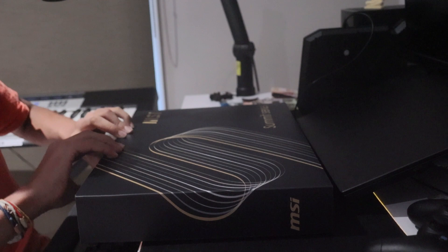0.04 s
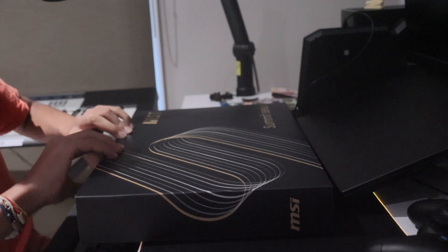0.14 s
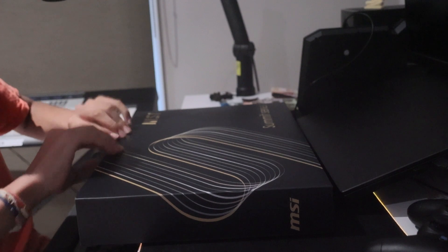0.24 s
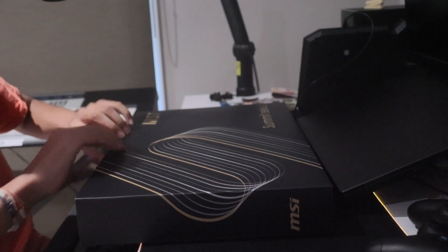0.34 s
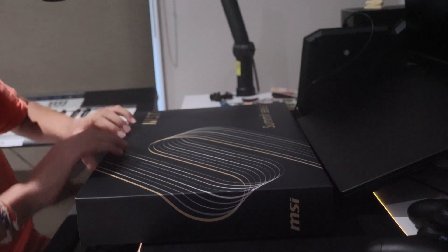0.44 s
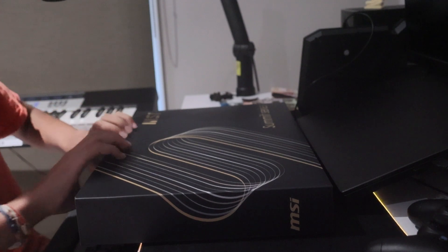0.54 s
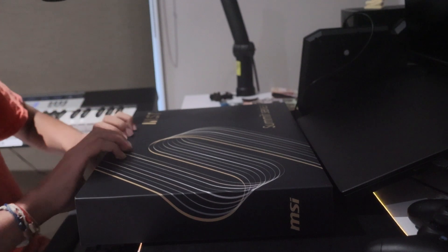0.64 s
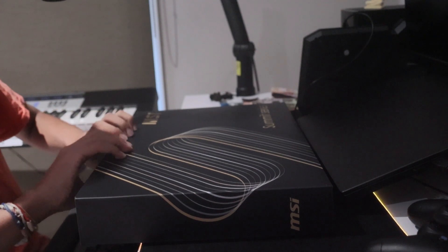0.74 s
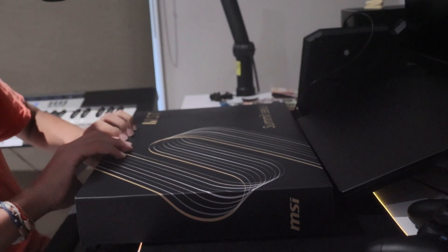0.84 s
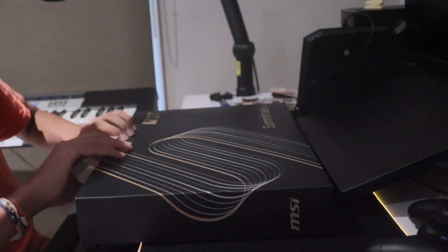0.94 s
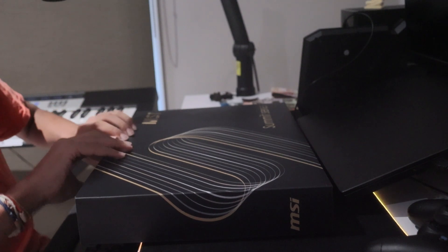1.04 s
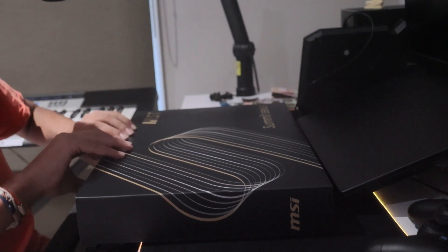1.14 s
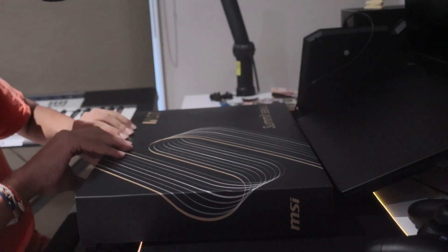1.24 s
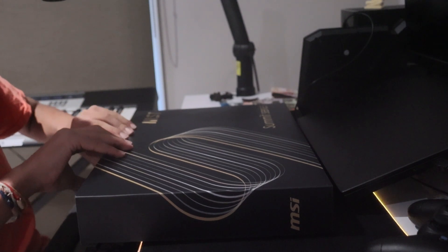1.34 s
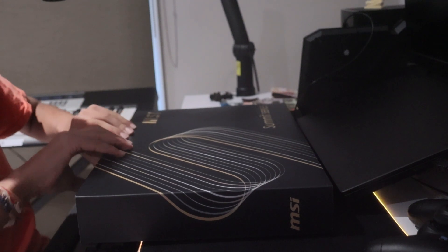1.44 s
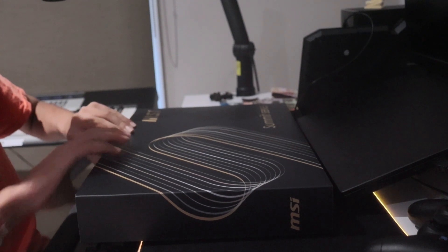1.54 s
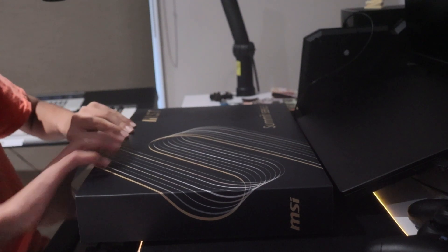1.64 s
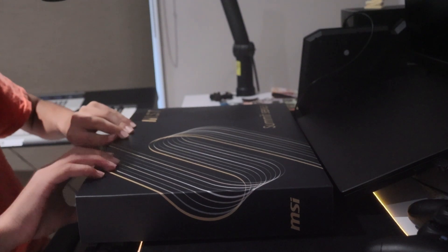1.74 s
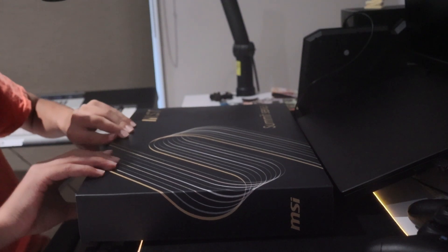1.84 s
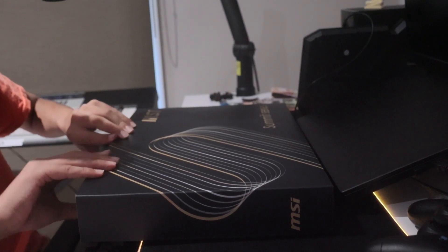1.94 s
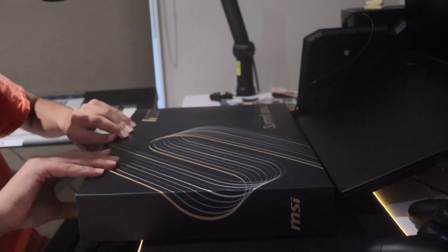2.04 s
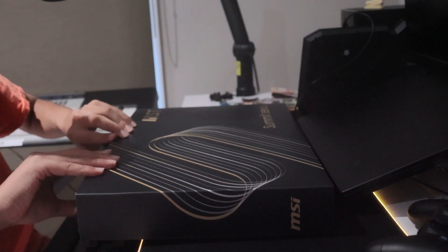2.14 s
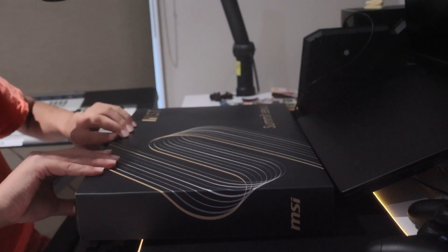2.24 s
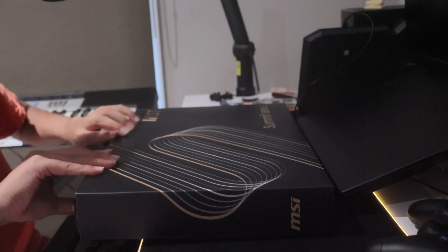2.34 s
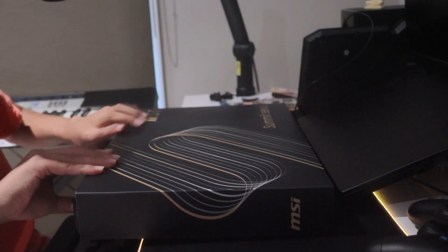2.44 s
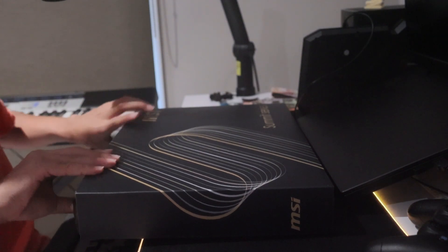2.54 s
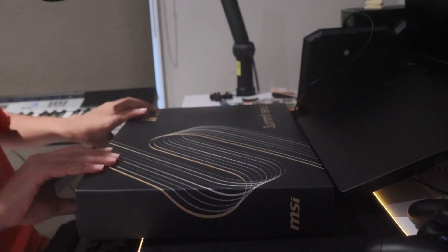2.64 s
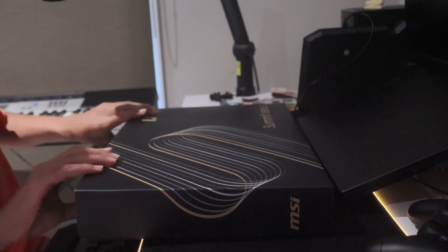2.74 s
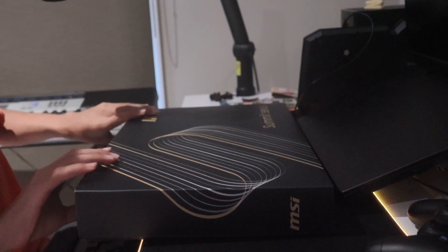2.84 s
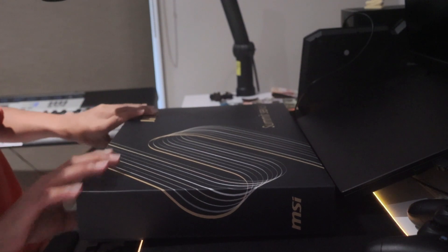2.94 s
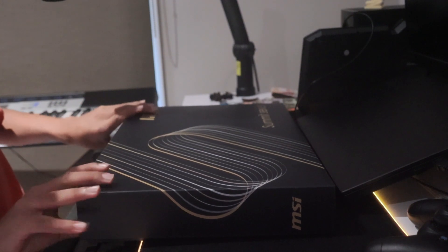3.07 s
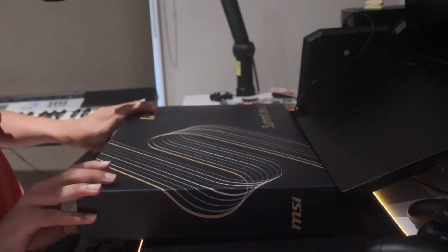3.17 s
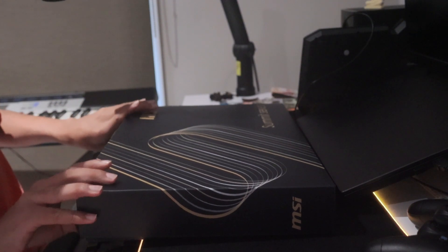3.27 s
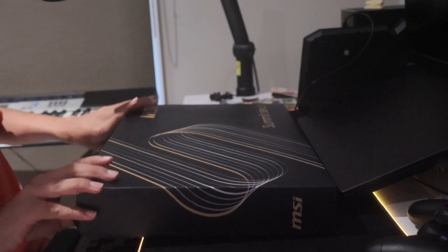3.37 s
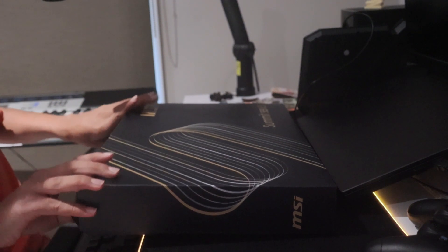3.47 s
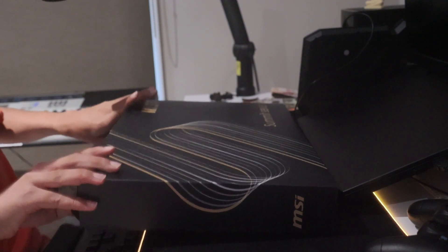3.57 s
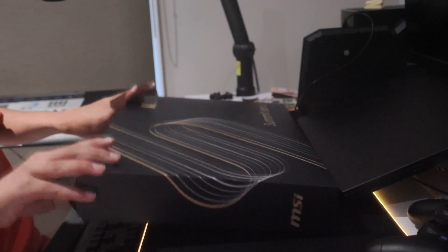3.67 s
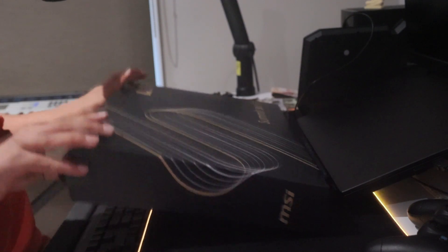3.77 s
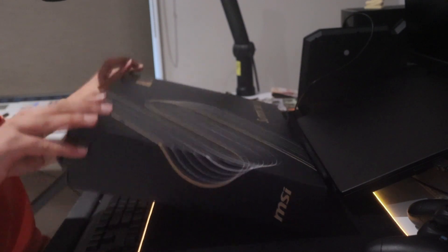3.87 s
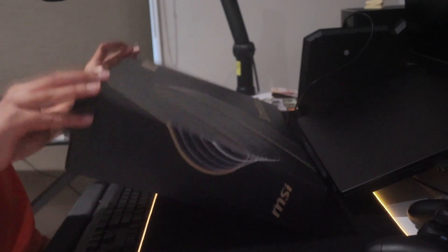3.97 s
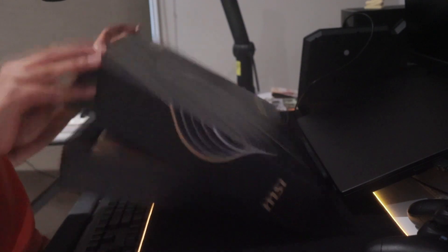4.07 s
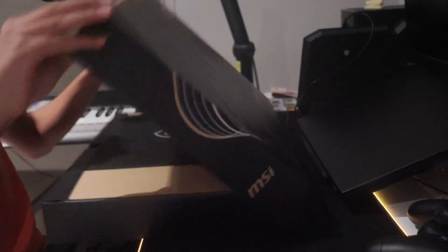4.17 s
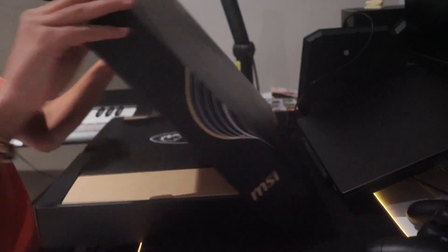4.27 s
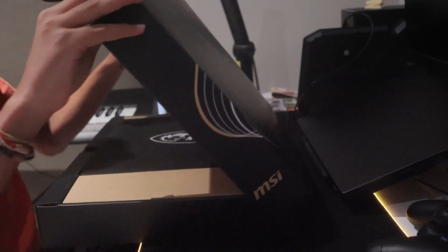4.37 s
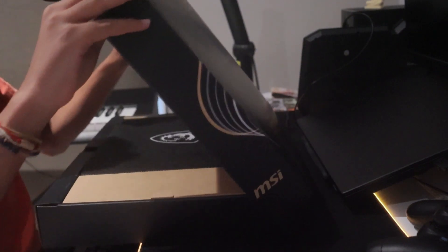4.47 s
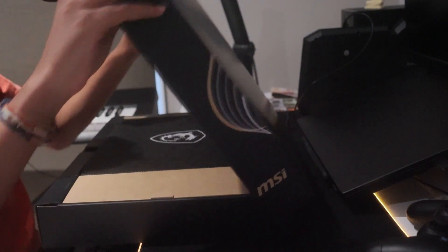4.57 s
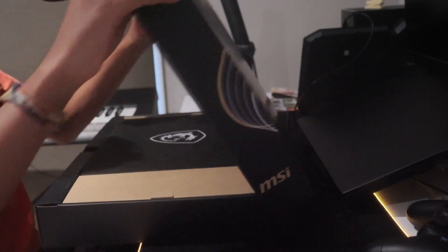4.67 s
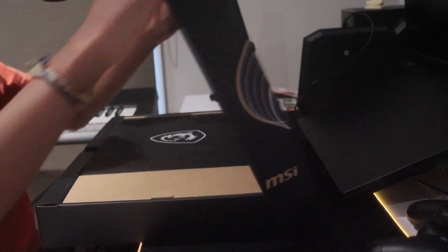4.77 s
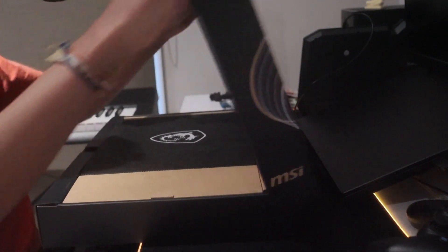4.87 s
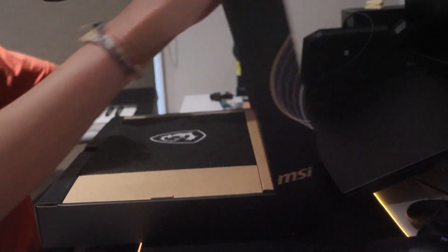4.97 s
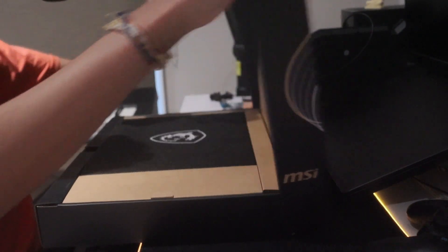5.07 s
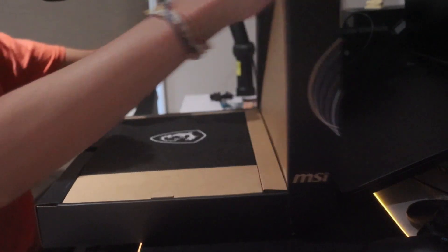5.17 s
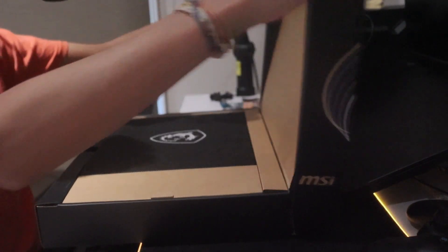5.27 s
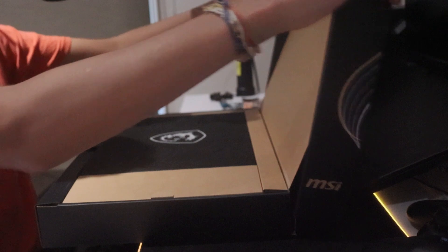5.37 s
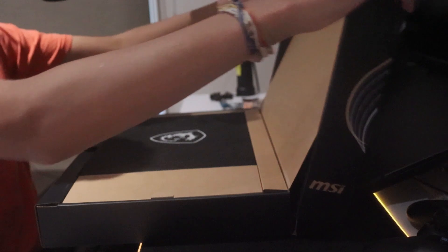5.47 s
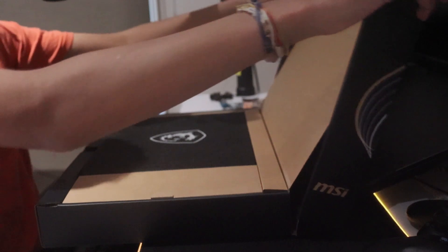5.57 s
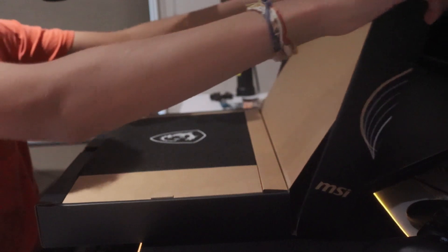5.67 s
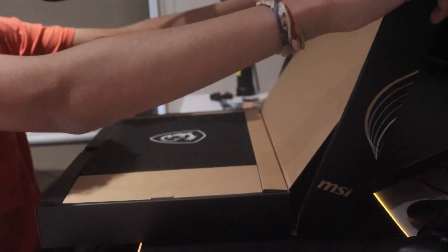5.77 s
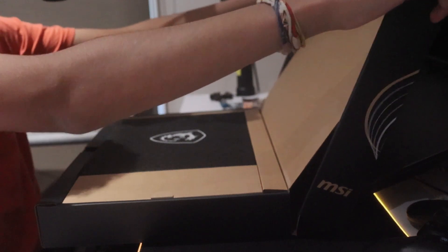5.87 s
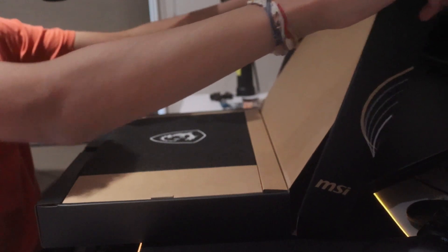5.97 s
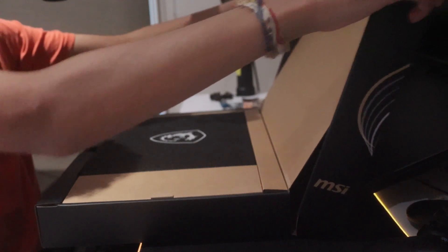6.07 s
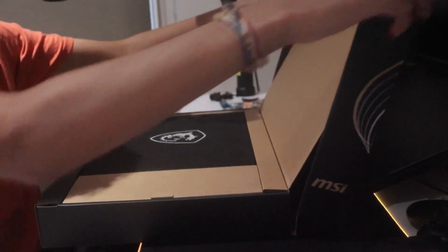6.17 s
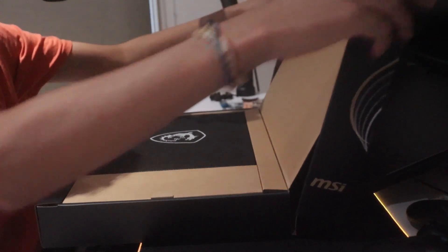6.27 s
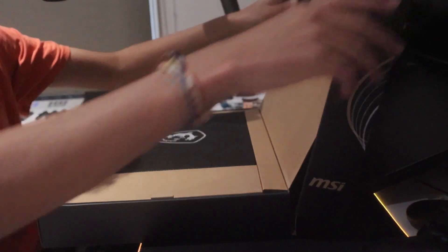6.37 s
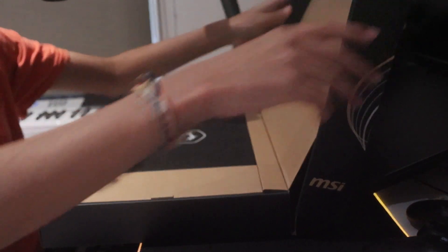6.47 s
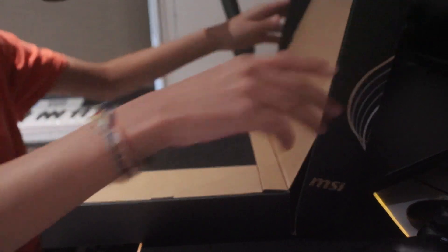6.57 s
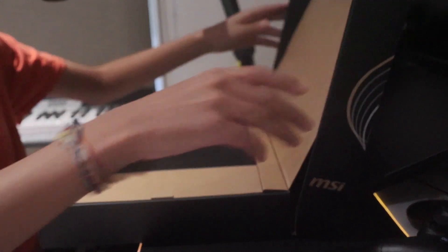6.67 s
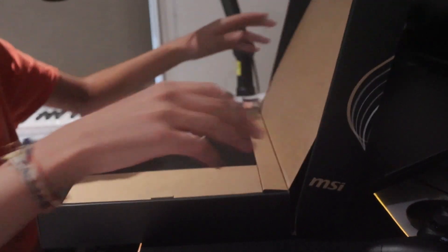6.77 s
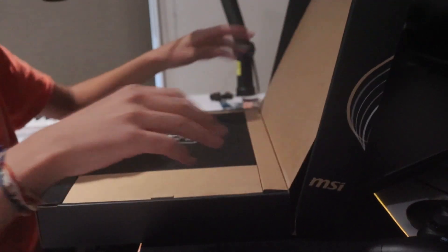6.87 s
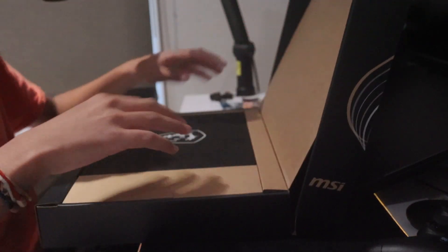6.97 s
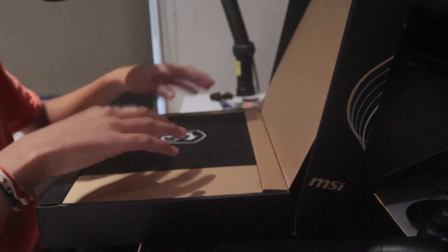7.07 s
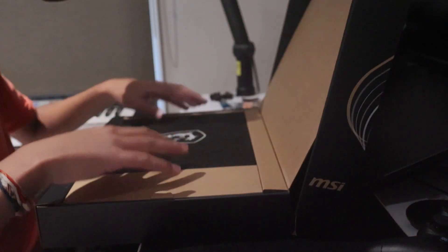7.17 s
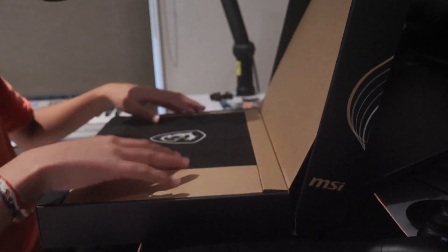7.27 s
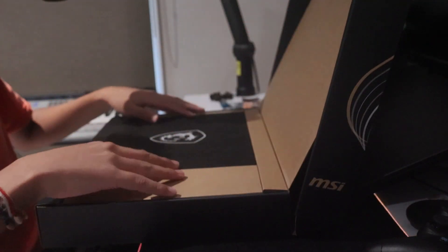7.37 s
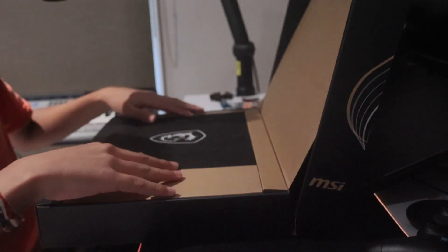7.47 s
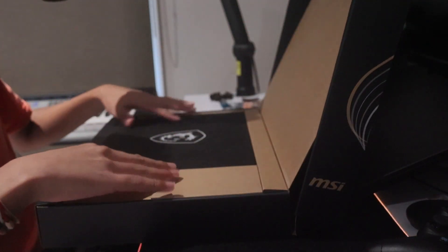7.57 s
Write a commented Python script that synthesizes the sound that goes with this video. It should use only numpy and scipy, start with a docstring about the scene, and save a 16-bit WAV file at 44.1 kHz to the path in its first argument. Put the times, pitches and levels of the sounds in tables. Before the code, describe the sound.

Hands tap and rub a cardboard box, two hard hollow knocks land seconds apart, then the lid scrapes and groans open over faint fan hum.

```python
"""Hands work the flaps of a cardboard box on a desk in a small room: fingers tap and rub the board,
tabs snap free, the tray drops on the desk twice, and the lid scrapes and groans as it swings open.
Blows ring decaying modes and noise bursts, rubbing is grainy noise, panel rings and groans are narrow
noise whose pitch may glide. A small metal part jumps on the desk, ringing its own modes. Fans hum behind
as steady noise, a blade tone and a low rumble that comes and goes. A close stereo pair listens."""
import sys
import numpy as np
from scipy import signal
from scipy.fft import rfft, irfft, next_fast_len
from scipy.io import wavfile
from scipy.ndimage import map_coordinates

SR = 44100
rng = np.random.default_rng(int(sys.argv[2]) if len(sys.argv) > 2 else 0)


def dump(signal):
    """Clip the signal to [-1, 1] and save it as 16-bit WAV at the path in sys.argv[1]."""
    limited = np.clip(np.atleast_2d(signal).T, -1, 1)
    pcm = np.round(limited * 32767).astype(np.int16)
    wavfile.write(sys.argv[1], SR, pcm)


N = 335601

# Fan air in the room: (frequency [Hz], relative level [dB per Hz])
FAN_AIR_SPECTRUM = [(20, -36.5), (45, -21), (70, -17), (90, -5), (116, -22), (141, -9), (180, -21.5),
                    (400, -20.5), (700, -23.5), (1500, -25.5), (3500, -27), (8000, -32), (15900, -41)]
# Left-right likeness of the fan noise and rumble at the pair: (frequency [Hz], likeness [-1 to 1])
FAN_LIKENESS = [(60, 0.76), (180, 0.76), (550, -0.049), (1650, -0.26), (4970, -0.48), (15000, -0.48)]
# Fan blade tone: (frequency [Hz], level [dB])
BLADE_TONE = [(640.6, -79)]
# Low noise that comes and goes: (time [s], level [dB])
RUMBLE_LEVEL = [(0.0, -71), (0.27, -64), (0.68, -74), (0.849, -61.5), (1.65, -62), (2.05, -66),
                (2.41, -59.5), (2.8, -73), (3.11, -60), (3.48, -70), (4.3, -60.5), (5.38, -75), (5.7, -65),
                (6.8, -85.5), (7.61, -76.5)]
# Colour of that low noise: (frequency [Hz], relative level [dB per Hz])
RUMBLE_SPECTRUM = [(12, -61.5), (20, -29), (75, 1), (108, -8), (140, -1.5), (170, -19.5), (220, -50.5),
                   (370, -120)]
# Decay of the small room: (frequency [Hz], t60 [s])
ROOM_DECAY = [(100, 0.25), (400, 0.26), (1500, 0.29), (5000, 0.3), (14000, 0.18)]
# Left-right likeness of room tail, rubbing and cracks: (frequency [Hz], likeness [-1 to 1])
BOX_LIKENESS = [(60, 1), (150, 1), (380, 0.99), (950, 0.97), (2380, 0.9), (5980, 0.7), (15000, -0.068)]
# Modes of the box's air and walls: (frequency [Hz], relative level [dB], t60 [s])
BOX_MODES = [(137.3, -4.5, 0.28), (199.9, -14.5, 0.14), (267, -2.5, 0.14), (320.9, -1, 0.04),
             (407, 3, 0.48), (484, -0.5, 0.026), (585, -0.5, 0.11), (680, -9, 0.017), (748.6, -7, 0.097),
             (787, -9, 0.2), (1105, -15, 0.12)]
# Upper modes of the board: (frequency [Hz], width [Hz], relative level [dB])
BOARD_MODES = [(1020, 1500, -5.5), (2500, 1500, -4), (3950, 3400, -10.5)]
# Panels driven by rubbing: (frequency [Hz], relative level [dB per Hz])
PANEL_SPECTRUM = [(41, -61), (70, -37), (134, -13), (187, -15), (237, -3), (269, -6), (900, -8),
                  (1170, -42.5), (1980, -120)]
# Body of the rubbing: (frequency [Hz], relative level [dB per Hz])
RUB_SPECTRUM = [(400, -34.5), (700, -6), (1000, -3.5), (1800, -7.5), (2500, -14), (4000, -29), (8000, -73)]
# Rasp of the fibres: (frequency [Hz], relative level [dB per Hz])
RASP_SPECTRUM = [(1200, -27), (2200, -0.5), (3000, 1), (4200, -2.5), (5500, -5), (7500, -16),
                 (11000, -39.5)]
# Fine hiss of a smooth fast glide: (frequency [Hz], relative level [dB per Hz])
HISS_SPECTRUM = [(3820, -21), (6500, -5), (11900, -11.5), (15100, -11.5), (15900, -20.5)]
# Crack of a blow: (frequency [Hz], relative level [dB per Hz])
CRACK_SPECTRUM = [(1500, -31.5), (3000, -6), (4500, 3), (8000, -0.5), (15900, -8)]
# A small metal part on the desk: (frequency [Hz], relative level [dB], t60 [s])
METAL_MODES = [(4980, 1, 0.16), (5800, 5.5, 0.09), (5900, 2.5, 0.08), (7550, -9.5, 0.028),
               (9160, 3.5, 0.025), (12400, -6, 0.025)]
# Jumps of the metal part as the desk shakes: (time [s], level [dB])
METAL_JUMPS = [(2.298, -55), (4.268, -36), (4.29, -34.5), (4.333, -37.5)]
# Panels that ring after a blow or groan when dragged: (time of full strength [s], rise [s], hold [s],
# fall t60 [s], level [dB], pitch [Hz], glide [Hz per s])
PANEL_TONES = [(0.01, .01, .06, .15, -37, 1057, 0.5), (0.14, 0.009, 0.042, .3, -37, 1249, -200),
               (0.265, .015, 0.036, .2, -24, 603, -1), (0.827, 0.13, 0.1, .28, -50.5, 432, 100),
               (1.129, .06, .07, .4, -53.5, 1148, -50), (1.8, 0.059, .02, 0.31, -50, 135.2, 10.5),
               (3.35, .15, 0.025, .6, -48.5, 265.5, -40), (4.24, .03, .02, 0.2006, -22, 205.2, -0.5),
               (4.38, .15, 0.0059, 0.47, -27, 302.8, 29), (4.863, .5, .1, 0.29, -44.5, 332.3, 39.5),
               (5.139, .2, .05, .2, -55, 345.9, 79.5), (5.339, .2, .06, 0.24, -39.5, 240.1, 11.5),
               (5.521, .1, 0.055, 0.14, -34.5, 237.5, 94), (6.2, .25, .005, .4, -50, 341.7, -19)]
# Board rubbing or rattling on board, one row a stroke: (time of full strength [s], rise [s], hold [s],
# fall t60 of the rub [s], rub level [dB], weight over rub [dB], bite over rub [dB], swish over rasp [dB])
# weight = boom of the panels, bite = rasp of the fibres, swish = fine hiss
RUB_STROKES = [(0.0, .003, 0.009, 0.49, -35.5, -1, -0.5, -3.5),
               (0.14, 0.016, 0.038, .2, -36.5, 0.5, -1.5, -3.5),
               (0.262, 0.011, 0.023, .5, -30.5, 5.5, -6.5, -4), (0.7, 0.022, .01, .15, -72.5, 12, 6, -19),
               (0.775, 0.03, .17, 0.31, -54.5, 6, -7, -10.5),
               (1.016, 0.047, 0.013, .3, -58, -1, -6.5, -13.5), (1.15, 0.16, 0.014, .5, -53, -5, -14, -8),
               (1.27, .02, .01, .5, -67.5, -2, -2.5, -5.5),
               (1.46, .015, 0.024, 0.299, -72.5, 6.5, -0.5, 10),
               (1.55, 0.008, 0.056, .25, -52, 4, -1.5, -13.5),
               (1.782, 0.078, .04, .25, -54, -0.5, -2, -13.5),
               (1.886, 0.015, .005, .3, -57.5, -6, -11, -10.5),
               (2.06, 0.049, 0.0041, .25, -67.5, 16.5, 2, -12), (2.18, .02, .01, .5, -72.5, 17, -1, -10),
               (2.31, .01, .06, .35, -45.5, 1, -3, -20), (2.66, 0.018, 0.028, .2, -52.5, -4, -3, -7),
               (2.696, 0.041, 0.0058, .25, -47, -4, -1.5, -7),
               (2.794, 0.017, 0.0067, .5, -53, 2, -13.5, -8),
               (2.93, .08, 0.024, 0.34, -58.5, 5.5, -3.5, -7.5), (2.97, .006, 0.069, .4, -52, 0, -2, -6.5),
               (3.072, 0.093, 0.021, .6, -43.5, -1.5, -5, -8.5), (3.306, .03, .02, 0.44, -55, 8, -12, -4),
               (3.48, 0.041, .07, .3, -74.5, 15, 3, -10.5), (3.69, 0.011, .02, 0.287, -61, 3, 2.5, -6),
               (3.766, .07, .18, 0.79, -51, 3, 4, -1.5), (4.066, 0.1, .02, 0.55, -44, 3, -1, -0.5),
               (4.13, .01, 0.011, 0.42, -37.5, 7.5, -2, -14.5), (4.185, .006, .02, .2, -36, 3, 2, -6.5),
               (4.225, 0.012, 0.083, 0.62, -27.5, 3, -5.5, -3), (4.78, 0.29, 0.035, .4, -48, 1.5, -8, -16),
               (4.853, 0.01994, 0.00509, 0.66, -46, 6.5, -13.5, -9.5),
               (4.985, .06, .005, 0.51, -50.5, 6, -18.5, -13),
               (5.191, 0.031, 0.016, 0.56, -51.5, 2.5, -6, -12.5),
               (5.29, .15, 0.14, 0.334, -50.5, 10.5, -8.5, -9.5),
               (5.44, .02, 0.15, 0.93, -46.5, 5.5, -8.5, -14),
               (5.719, 0.047, 0.012, .6, -42, 8.5, -1, -14.5),
               (5.86, .04, .02, .2, -52.5, 5.5, -6.5, -10.5),
               (6.002, 0.042, .04, 0.445, -65.5, -0.5, -5, -10),
               (6.2, .25, 0.034, .4, -53.5, -1.5, -0.5, -15), (6.31, 0.029, .05, 0.51, -62.5, 5, -4.5, -9),
               (6.52, 0.013, .04, .3, -63, -3.5, -2.5, -13), (7.19, 0.032, 0.0051, .6, -73.5, -10, 3, -12),
               (7.41, 0.011, .05, 0.99, -73.5, 6.5, -1.5, -7), (7.6, .1, .02, .3, -62.5, 2, -0.5, 1)]
# Blows on the box: (time [s], knock peak [dB], thud over knock [dB], crack over knock [dB],
# thud centre [Hz], knock centre [Hz], crack centre [Hz], rattle t60 [s])
BOX_BLOWS = [(0.128, -17, -18.5, -1.5, 400, 1200, 5260, 0.057),
             (0.132, -14.5, -15.5, -5, 404, 1187, 6170, 0.027),
             (0.244, -10, -4, -23.5, 303, 900, 4200, 0.045), (0.247, -5, 1.5, -10.5, 283, 1676, 4230, .015),
             (0.275, -24.5, 10.5, -26, 265.2, 900, 4200, 0.09),
             (0.746, -44, -3, -25, 398, 1600, 4090, 0.025), (1.257, -50, -8, -1, 200, 1800, 5330, 0.021),
             (1.452, -68, -7.5, 23, 198, 900, 9250, 0.048), (1.536, -40, 10, -15, 134.4, 810, 4300, 0.03),
             (1.775, -43.5, -4, -10.5, 132, 1350, 5114, .03),
             (1.807, -43, -19, -4.5, 135, 1260, 4990, 0.037), (1.879, -41, -2, -28, 415, 1090, 4350, 0.021),
             (1.999, -49, 15.5, -10, 397, 2700, 4440, 0.036), (2.042, -51.5, 14, -5, 456, 800, 4390, 0.029),
             (2.262, -47, 1.5, -4, 418, 1480, 6790, .02), (2.297, -28, -1.5, -9.5, 566, 2330, 5730, 0.044),
             (2.355, -36, 9, -24.5, 200, 1000, 4500, 0.072),
             (2.69, -28.5, -11.5, -17, 480, 2400, 4170, 0.031),
             (2.789, -44, -8, -26, 288, 900, 5100, 0.013), (2.923, -48.5, -12, -3, 392, 2580, 4504, 0.018),
             (2.957, -31, -13, -6, 510, 3570, 4020, .03),
             (3.029, -41.5, 11.5, -7, 259, 1770, 5370, 0.01937),
             (3.072, -45.5, 12, -10.5, 259, 1475, 4980, 0.03), (3.211, -39.5, -4, -22, 488, 904, 4780, .02),
             (3.486, -48, 9, -22, 401, 800, 4600, .02), (3.674, -35.5, 8, -25.5, 420, 2000, 4070, .012),
             (3.879, -30, -5, -17.5, 298, 1500, 4170, .01), (4.116, -22, 5, -26.5, 450, 840, 4190, 0.042),
             (4.179, -14.5, -11, -6, 414, 1800, 4140, .04), (4.208, -3, 2, -9.5, 320, 1399, 5160, 0.021),
             (4.217, -4, -3.5, -17.5, 260, 900, 5004, .02), (4.249, -7, -6.5, -14.5, 200, 800, 6620, 0.022),
             (4.269, -12.5, -26, -5.5, 338.7, 1260, 9580, 0.034),
             (4.292, -16.5, -2.5, -13, 390, 1400, 9660, 0.039),
             (4.33, -19, 7.5, -20.5, 184, 1050, 5008, 0.06), (4.845, -35, -20, -29, 335, 800, 5444, .02),
             (5.168, -42.5, -19, -18, 359, 1110, 4175, 0.034),
             (5.428, -27, -23, -37, 253, 1600, 4010, 0.01213),
             (5.545, -35.5, -18, -27, 246, 2000, 4630, .02), (5.679, -31, -6, -25, 315, 1800, 5100, 0.024),
             (5.711, -38.5, -7, -24, 649, 902, 5280, 0.019),
             (5.772, -25.5, -3.5, -22, 326, 800, 3956, 0.011),
             (5.839, -33, 1.5, -24.5, 495, 2500, 4100, .03), (6.505, -39, -11, -13, 533, 1650, 5130, .03),
             (7.4, -55.5, 5.5, -17.5, 476, 760, 4880, 0.033)]


def amp(db):
    """Gain of a level in dB."""
    return 10 ** (np.asarray(db) / 20)


def unit(x):
    """x scaled to rms 1."""
    return x / np.sqrt(np.mean(x ** 2) + 1e-20)


def peak(x):
    """x scaled to a peak of 1."""
    return x / np.abs(x).max()


def along(points, hz):
    """Values of a (Hz, value) table, joined by lines on a log frequency axis."""
    f, values = np.transpose(points)
    return np.interp(np.log(hz + 1), np.log(f + 1), values)


def near(hz, centre_hz, fall_db):
    """Gain falling by fall_db for each octave away from a centre."""
    return amp(-fall_db * np.abs(np.log2((hz + 1) / centre_hz)))


def wobble(rate):
    """A smooth random curve with rate knots a second."""
    knots = rng.standard_normal(int(N * rate / SR) + 4)
    return map_coordinates(knots, [np.arange(N) * rate / SR])


def per_sample(x):
    """Values a millisecond apart, joined by lines at the sample rate."""
    return np.interp(np.arange(N) * 1000 / SR, np.arange(len(x)), x)


def swells(s, rise, hold, t60, db):
    """Rise, hold and fall of all rows: joint rms per sample, and the loudest row per millisecond."""
    t = np.arange(N * 1000 // SR + 2)[:, None] / 1000 - s
    climb_db = 25 * np.minimum(t, 0) / rise  # climbs 25 dB during the rise
    fall_db = 60 * np.maximum(t - hold, 0) / t60
    level_db = db + climb_db - fall_db
    return per_sample(np.sqrt(np.sum(amp(2 * level_db), axis=1))), level_db.argmax(axis=1)


def filtered(x, response):
    """x shaped by a complex response of frequency."""
    n = x.shape[-1]
    padded = next_fast_len(n + 8192)
    spectrum = rfft(x, padded) * response(np.fft.rfftfreq(padded, 1 / SR))
    return irfft(spectrum, padded)[..., :n]


def spread(pair, alike):
    """Two unrelated signals mixed into left and right of the given likeness."""
    def mid_side_gains(hz):
        turn = np.arccos(np.clip(along(alike, hz), -1, 1)) / 2
        return np.array([np.cos(turn), np.sin(turn)])

    mid, side = filtered(pair, mid_side_gains)
    return np.array([mid + side, mid - side])


def grainy(spectrum, alike, grain_db, grain_hz, ragged_db=0):
    """Coloured stereo noise of rms 1, its strength wandering and its spectrum ragged as from dense modes."""
    slips = amp(grain_db * wobble(grain_hz)) * rng.standard_normal((2, N))
    knots = rng.standard_normal(SR // 60)  # one every 30 Hz

    def colour(hz):
        ragged = ragged_db * np.interp(hz, np.arange(len(knots)) * 30., knots)
        return amp(along(spectrum, hz) + ragged)

    return unit(spread(filtered(slips, colour), alike))


def narrow(hz, spread_hz):
    """Noise of rms 1 in a narrow band around a moving frequency; the width may move too."""
    turn = 2 * np.pi * np.cumsum(hz) / SR
    place = np.cumsum(spread_hz * np.ones(N)) / SR
    a, b = (map_coordinates(knots, [place]) for knots in rng.standard_normal((2, N // 40)))
    return unit(a * np.cos(turn) + b * np.sin(turn))


def ringing(modes, t, weight):
    """Decaying sine modes, each at a new random strength."""
    total = 0
    for hz, db, t60 in modes:
        strength = weight(hz) * amp(db + rng.normal(0, 4.9) - 60 * t / t60)
        total = total + strength * np.sin(2 * np.pi * hz * t)
    return total


def fans():
    """Steady air noise of the room, a narrow blade tone and a low rumble of changing level."""
    air = amp(-60) * grainy(FAN_AIR_SPECTRUM, FAN_LIKENESS, grain_db=.2, grain_hz=6)
    tone = sum(amp(db) * narrow(np.full(N, hz), spread_hz=7.1) for hz, db in BLADE_TONE)
    rumble_db = np.interp(np.arange(N) / SR, *np.transpose(RUMBLE_LEVEL))
    rumble = grainy(RUMBLE_SPECTRUM, FAN_LIKENESS, grain_db=2.0, grain_hz=8)
    return air + tone + amp(rumble_db) * rumble


def room(x):
    """The room answers with a fresh diffuse tail; each frequency dies at its own speed."""
    hz, t, cells = signal.stft(rng.standard_normal((2, SR * 2 // 5)), SR, nperseg=256)
    decay = amp(-60 * t / along(ROOM_DECAY, hz)[:, None])
    tail = signal.istft(cells * decay, SR, nperseg=256)[1]
    tail = spread(tail, BOX_LIKENESS)
    delayed = np.pad(x, (130, 0))  # the tail starts about 3 ms after the direct sound
    return signal.fftconvolve(delayed[None], tail / np.linalg.norm(tail[0]), axes=1)


def add_in_room(out, s, dry):
    """Lays a close sound and its room tail at time s."""
    wet, at = room(np.atleast_2d(dry)[0]), round(s * SR)  # a stereo sound feeds the room from its left
    out[:, at:at + dry.shape[-1]] += dry
    out[:, at:at + wet.shape[1]] += wet


def metal_part(t):
    """The small metal part rings its modes and chatters on the desk, in random steps of 180 samples."""
    chatter = np.repeat(rng.standard_normal(len(t) // 180), 180)
    return ringing(METAL_MODES, t, np.ones_like) * chatter


def panel_tones():
    """The loudest panel ring or groan at each moment, as narrow noise; its pitch may glide."""
    s, rise, hold, t60, db, hz, glide = np.transpose(PANEL_TONES)
    strength, row = swells(s, rise, hold, t60, db)
    since = np.arange(len(row)) / 1000 - s[row]
    pitch_hz = per_sample(hz[row] + glide[row] * since)
    return strength * narrow(pitch_hz, spread_hz=np.abs(pitch_hz) / 6)  # width set by a Q of 6


def hollow(f):
    """Gain of the box's modes as steady resonances over a plain response."""
    power = amp(-21.5)  # the plain part
    for centre, db, t60 in BOX_MODES:
        width = 1.8 / t60 * 1.2
        power = power + amp(2 * db) / (1 + (2 * (f - centre) / width) ** 2)
    return np.sqrt(power)


def slide():
    """Rubbing booms in the panels through the box's modes, with rub, rasp and hiss as coloured noise."""
    s, rise, hold, t60, rub_db, weight_db, bite_db, swish_db = np.transpose(RUB_STROKES)
    strength, loudest = swells(s, rise, hold, t60, rub_db)
    rub_hz = per_sample(1360 + 35 * bite_db[loudest])  # centre of the rub band, higher with bite

    panel = grainy(PANEL_SPECTRUM, BOX_LIKENESS, grain_db=0.0, grain_hz=59.0, ragged_db=3.5)
    panel = unit(filtered(panel, hollow))
    rub = grainy(RUB_SPECTRUM, BOX_LIKENESS, grain_db=-0.5, grain_hz=315, ragged_db=4.0)
    rub = rub + amp(-6.0) * narrow(rub_hz, spread_hz=550)  # a noise band whose centre moves with the bite
    rasp = grainy(RASP_SPECTRUM, BOX_LIKENESS, grain_db=1.5, grain_hz=518.5, ragged_db=4.0)
    hiss = grainy(HISS_SPECTRUM, BOX_LIKENESS, grain_db=1.0, grain_hz=700, ragged_db=3.0)

    rubbing = strength * rub
    # (layer, its fall time over that of the rub, its level over the rub [dB])
    layers = [(panel, 1.046, weight_db), (rasp, 0.8, bite_db), (hiss, .55, bite_db + swish_db)]
    for layer, lasts, db in layers:
        rubbing = rubbing + swells(s, rise, hold, t60 * lasts, rub_db + db)[0] * layer

    jerks = amp(0.53 * wobble(18))  # of the hand, felt by all layers
    ticks = amp(4 * np.maximum(wobble(150) - 1.4, 0))  # single fibres snap
    return ticks * jerks * rubbing


def board(f):
    """Causal response of the board's upper modes, with alternating signs."""
    total = 0
    for k, (centre, width, db) in enumerate(BOARD_MODES):
        damping = 1j * f * width
        total = total + (-1) ** k * amp(db) * damping / (centre ** 2 - f ** 2 + damping)
    return total


def blow(t, db, thud_db, crack_db, thud_hz, knock_hz, crack_hz, rattle):
    """A blow clicks, rattles briefly and rings the box modes, favouring those near its thud centre."""
    fade, noise = amp(-60 * t / rattle), rng.standard_normal((3, len(t)))
    noise[0, 0] = 2.3  # first contact

    soft_start = 1 - np.exp(-t / 0.0009)  # soft contact rounds the start, then damps the ring
    box_ring = ringing(BOX_MODES, t, lambda hz: near(hz, thud_hz, 21))
    thud = peak(box_ring * soft_start * fade ** 0.32)

    def knock_response(hz):
        return board(hz) * 1j * hz / (knock_hz ** 2 - hz ** 2 + .7j * hz * knock_hz)

    knock = peak(filtered(fade * noise[0], knock_response))

    def crack_response(hz):
        return amp(along(CRACK_SPECTRUM, hz)) * near(hz, crack_hz, 5.2)

    crack = spread(filtered(noise[1:], crack_response), BOX_LIKENESS)
    crack = peak(fade * (1 - np.exp(-t / 0.00097)) * crack)
    return amp(db) * (knock + amp(thud_db) * thud + amp(crack_db) * crack)


def impacts():
    """Blows on the box and jumps of the metal part, close to the pair, each answered by the room."""
    out, t = np.zeros((2, N + 2 * SR)), np.arange(SR // 5) / SR
    for s, db in METAL_JUMPS:
        add_in_room(out, s, amp(db) * metal_part(t))
    for s, *settings in BOX_BLOWS:
        add_in_room(out, s, blow(t, *settings))
    # a box this small sends out no deep bass
    return filtered(out[:, :N], lambda hz: (1j * hz / (60 + 1j * hz)) ** 3)


def scene():
    """Fans behind, then the panel tones, the rubbing and the blows close to the pair."""
    return fans() + panel_tones() + slide() + impacts()


def record(dry):
    """The loudest peaks flatten at full scale; nothing is kept from 15900 Hz up."""
    flat = dry / (1 + np.abs(dry) ** 8) ** (1 / 8)
    return filtered(flat, lambda hz: hz < 15900)


dry = scene()
out = record(dry)
dump(out)
```